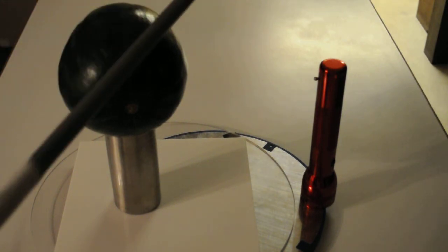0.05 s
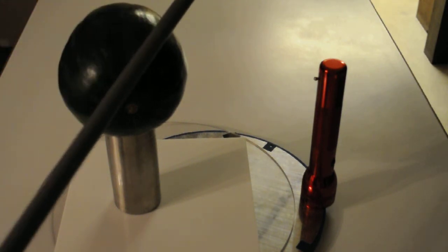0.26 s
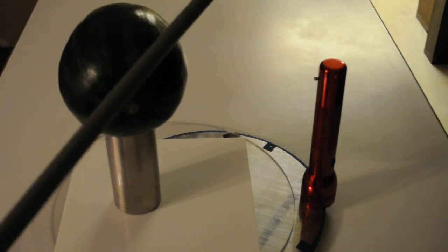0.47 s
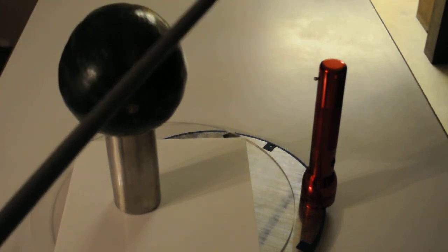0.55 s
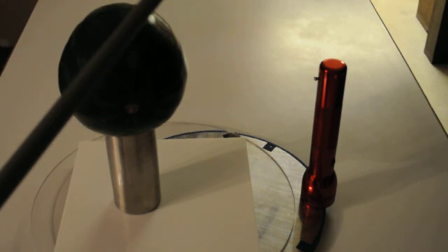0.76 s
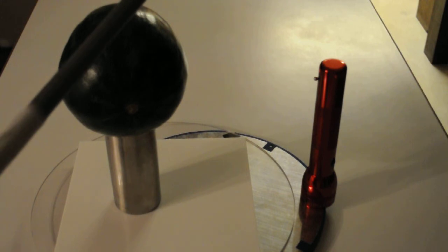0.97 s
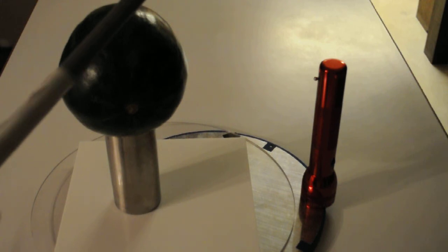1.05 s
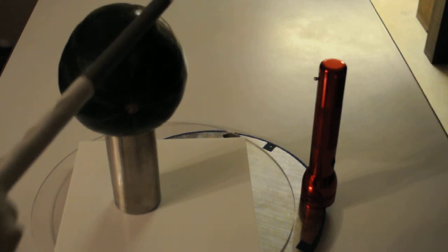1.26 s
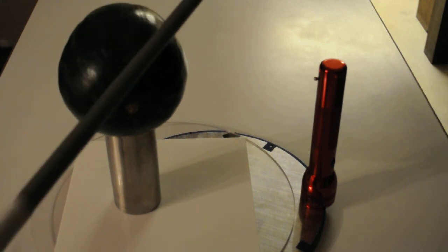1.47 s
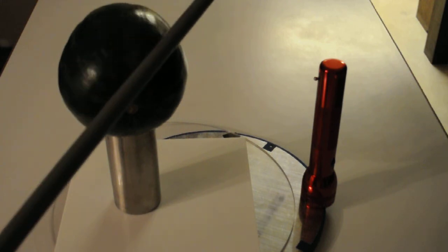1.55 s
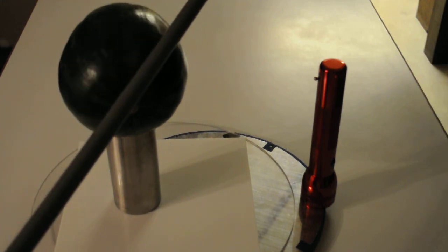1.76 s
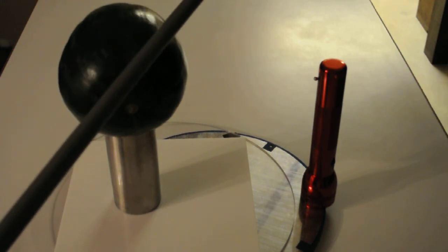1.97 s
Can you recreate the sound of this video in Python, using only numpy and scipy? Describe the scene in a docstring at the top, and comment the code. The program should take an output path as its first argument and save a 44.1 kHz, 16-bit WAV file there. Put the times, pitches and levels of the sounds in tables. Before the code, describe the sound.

One sharp spark crack rings out amid electrical hiss, crackle and small snaps in a workshop.

```python
"""A dull bump on a workshop bench dies away while a machine hums quietly behind everything.
A charged rod moves past a metal ball, and electricity leaking into the air (corona) hisses, crackles
and snaps. At 0.35 s one big spark jumps with a harsh, clipped crack and rings through the room.
The weakened hiss swells softly around 1 s, a second bump comes at 1.27 s, and the snaps grow busy again."""
import sys
import numpy as np
from scipy import signal
from scipy.fft import rfft, irfft, next_fast_len
from scipy.io import wavfile
from scipy.ndimage import map_coordinates

SR = 44100
rng = np.random.default_rng(int(sys.argv[2]) if len(sys.argv) > 2 else 0)


def waveform_to_disk(signal):
    """Save audio, clipped to [-1, 1], as 16-bit WAV at the path in sys.argv[1]."""
    frames = np.transpose(np.atleast_2d(signal))
    scaled = np.clip(frames, -1, 1) * 32767
    samples = np.round(scaled).astype(np.int16)
    wavfile.write(sys.argv[1], SR, samples)


N = 88200
TIME_S = np.arange(N) / SR


def amp(db):
    """Turn decibels into a number to multiply by."""
    return 10 ** (np.asarray(db) / 20)


def along(table, hz):
    """Look up a table's value at any pitch, sliding between rows on a log scale."""
    pitches, values = np.transpose(table)
    return np.interp(np.log(hz + 1), np.log(pitches + 1), values)


def since(start_s):
    """Seconds since start_s, zero before it."""
    return np.maximum(TIME_S - start_s, 0)


def wobble(per_s):
    """A smooth curve through per_s random points a second."""
    return map_coordinates(rng.standard_normal(int(N * per_s / SR) + 4), [TIME_S * per_s])


def filtered(x, response):
    """Change the strength and timing of each pitch in x by response(hz)."""
    size = next_fast_len(N + SR // 2)
    return irfft(rfft(x, size) * response(np.fft.rfftfreq(size, 1 / SR)), size)[:N]


# How well the microphone hears each pitch: pitch_hz, gain_db
MIC_TONE = [(15, -16), (45, 0.5), (5000, 1.5), (5400, -3.5), (5800, -12.5), (6080, -26), (6350, -45.5),
            (6700, -83)]
def heard(x):
    """The microphone loses the deepest bass and the high treble."""
    return filtered(x, lambda hz: amp(along(MIC_TONE, hz)))


def noise(tone):
    """Noise shaped by a tone table, with an average (rms) size of 1 at the microphone."""
    x = filtered(rng.standard_normal(N), lambda hz: amp(along(tone, hz)))
    return x / heard(x).std()


def pulses(rows, response):
    """One click of air pressure for each row of start_s, peak_db."""
    start_s, peak_db = np.transpose(rows)
    samples = np.clip(np.round(start_s * SR).astype(int), 0, N - 1)
    train = np.bincount(samples, amp(peak_db), N)
    one_click = heard(filtered(signal.unit_impulse(N, N // 2), response))
    return filtered(train, response) / np.abs(signal.hilbert(one_click)).max()


# Knocks on the bench: start_s, strength_db
KNOCKS = [(-.06, -5.5), (1.272, 1.8)]
# The notes the bench rings with: pitch_hz, level_db, fade_s (time to fall 60 dB)
BENCH_NOTES = [(229, -41.5, .75), (249.4, -43, .7), (283, -46.5, .55), (335, -47, .45), (423.6, -43.5, .5),
               (504, -44.5, .55), (542, -50, .4)]
# The tone of a knock's click and of its boom: pitch_hz, gain_db
CLICK_TONE = [(1000, -37), (2600, -15.5), (3300, -2), (4500, 0), (5600, -1)]
BOOM_TONE = [(50, -27), (130, -14.5), (240, -1), (350, -9.5), (450, -2.5), (560, -12), (750, -20),
             (1500, -27.5), (4000, -59)]
def bumps(click_db=-25.5, boom_db=-36.5, boom_fade_s=.46, rise_s=.0023):
    """Each soft knock makes a thin click, sets the bench ringing and booms in the room."""
    clicks = [(start_s, db + click_db) for start_s, db in KNOCKS if start_s > 0]
    out = pulses(clicks, lambda hz: amp(along(CLICK_TONE, hz)))
    for start_s, strength_db in KNOCKS:
        t = since(start_s)
        ring = sum(amp(db - 60 * t / fade_s) * np.sin(2 * np.pi * hz * t)
                   for hz, db, fade_s in BENCH_NOTES)
        boom = amp(boom_db - 60 * t / boom_fade_s) * noise(BOOM_TONE)
        out += amp(strength_db) * (ring + boom) * (1 - np.exp(-t / rise_s))
    return out


# The notes the machine hums: pitch_hz, level_db
MACHINE_NOTES = [(177.2, -60.3), (190, -65.5), (236.9, -67.5), (301.5, -62), (355.3, -63), (489.9, -67.5)]
# The tone of the room's background noise: pitch_hz, gain_db
AIR_TONE = [(25, -43.5), (45, -25), (70, -4.5), (130, -8), (200, -1), (420, -1), (700, -8.5), (1300, -8.5),
            (2200, -14), (5000, -22)]
def workshop_hum(mains_hz=59.2, mains_db=-73, waver_db=2.8, air_db=-51.5):
    """A machine and the mains power hum a little unsteadily over the noise of the room."""
    hum = np.zeros(N)
    for hz, db in list(MACHINE_NOTES) + [(mains_hz, mains_db)]:
        level = amp(db + waver_db * wobble(12.9))
        drift = .571 * wobble(9.96)
        hum += np.sqrt(2) * level * np.sin(2 * np.pi * hz * TIME_S + drift)
    return hum + amp(air_db) * noise(AIR_TONE)


# The tone of one tiny spark: pitch_hz, gain_db
TINY_SPARK_TONE = [(100, -24.5), (600, -12), (1500, -8), (3000, -4), (4300, 0), (5500, -0.5)]
def tiny_spark(hz):
    """The filter for a tiny spark: -1j makes the air pressure swing quickly once each way."""
    return -1j * amp(along(TINY_SPARK_TONE, hz))


# The leak as the rod nears and leaves the ball; the big spark drains it: time_s, strength_db
CORONA_STRENGTH = [(0, -56), (.06, -52.5), (.085, -46), (.185, -46.5), (.26, -44.5), (.34, -43),
                   (.38, -49.5), (.7, -49.5), (.77, -47), (.84, -49), (.91, -47), (1.08, -48), (1.19, -58),
                   (1.39, -54.5), (1.46, -47.5), (1.621, -46.5), (1.7, -45), (1.81, -47.5), (1.87, -56),
                   (2, -55.5)]
# The tone of the hiss: pitch_hz, gain_db
HISS_TONE = [(200, -19.5), (600, 2), (1200, -2.5), (2300, 0.5), (3300, -0.5), (4500, 0.5), (5600, -4.5)]
def corona(hiss_db=-2, waver_db=.6, crackle_db=-3, crackles_per_s=900, spread_db=3.5):
    """Countless tiny sparks blur into hiss; the stronger the leak, the more the crackle stands out."""
    strength_db = np.interp(TIME_S, *np.transpose(CORONA_STRENGTH))
    hiss = amp(strength_db + hiss_db + waver_db * wobble(40)) * noise(HISS_TONE)
    fires = rng.random(N) < crackles_per_s / SR
    sizes = amp(spread_db * np.minimum(rng.standard_normal(N), 2))
    crackle = filtered(fires * sizes, tiny_spark)
    top_db = strength_db.max()
    steeper_db = top_db + 1.2 * (strength_db - top_db)  # crackle rises and falls more than hiss
    return hiss + amp(steeper_db + crackle_db) * crackle / heard(crackle).std()


# How long the room rings: pitch_hz, fade_s (time to fall 60 dB)
ROOM_FADE = [(200, .5), (800, 0.64), (2000, 0.62), (5500, 0.45)]
def room_fade(x, start_s):
    """Play x from start_s on, each pitch dying away as it does in the room."""
    hz, t, spectrum = signal.stft(x, SR, nperseg=256)
    fade = amp(-60 * np.maximum(t - start_s, 0) / along(ROOM_FADE, hz)[:, None])
    return signal.istft(spectrum * fade, SR, nperseg=256)[1][:N] * (TIME_S >= start_s)


# Small sparks heard one by one: start_s, peak_db
SMALL_SPARKS = [(.0390, -30.5), (.0512, -23), (.0726, -28), (.0795, -25), (.0822, -23.5), (.0946, -30),
                (.1484, -18), (.1513, -28), (.1661, -26), (.1707, -26), (.1988, -28.5), (.2029, -19),
                (.2096, -29.5), (.2206, -27), (.2240, -30), (.2389, -19.5), (.2425, -27.5), (.2460, -25.5),
                (.2534, -23), (.2584, -26), (.2640, -21.5), (.2711, -26), (.2780, -20), (.2864, -23),
                (.2933, -20), (.3041, -23), (.3210, -27), (.3245, -23.5), (.3286, -21.5), (.5970, -28),
                (.6284, -27), (.6383, -24.5), (.7061, -27.5), (.7451, -23.5), (.7696, -24), (.7808, -29.5),
                (.9926, -25.5), (1.3983, -26), (1.4312, -18.5), (1.4440, -20.5), (1.4945, -28),
                (1.5138, -21.5), (1.5462, -22.5), (1.5566, -27), (1.5666, -19), (1.5877, -20.5),
                (1.6034, -27), (1.6104, -25), (1.6494, -25.5), (1.6538, -29), (1.6576, -24), (1.6616, -27),
                (1.6668, -24), (1.6798, -24.5), (1.6910, -29.5), (1.7084, -20.5), (1.7323, -22),
                (1.7499, -25), (1.7598, -25), (1.7854, -26), (1.8028, -27.5), (1.8151, -29),
                (1.8337, -26.5), (1.8951, -19), (1.9741, -23)]
def snaps(room_db=-11):
    """Small sparks snap close by, with only a little echo from the room."""
    direct = pulses(SMALL_SPARKS, tiny_spark)
    room = room_fade(rng.standard_normal(N), 0)
    echo = signal.fftconvolve(direct, room / np.linalg.norm(room))[:N]
    return direct + amp(room_db) * echo


# Hard surfaces that throw the crack back: delay_s, peak_db
WALL_ECHOES = [(.001, -17), (.0041, -8.5), (.0155, -20.5), (0.095, -22.5)]
# The tone of the crack and of the room's answer: pitch_hz, gain_db
CRACK_TONE = [(30, 6), (300, -1), (1300, 8), (2300, 2), (3500, 1.5), (6000, 8)]
ECHO_TONE = [(60, -26.5), (250, -31), (500, -5), (900, -4), (1500, -0.5), (2800, -1), (4500, 1.5),
             (5600, .5)]
def big_spark(start_s=.346, peak_db=.6, tail_db=-24, tail_rise_s=.0036):
    """One very short, hard push of air bounces off the walls and leaves the room ringing."""
    def bright_crack(hz, ring_hz=4550, width_hz=1100, ring_db=6):
        """A brief high ring gives the crack its bright edge."""
        ring = 1j * hz * width_hz / (ring_hz ** 2 - hz ** 2 + 1j * hz * width_hz)
        return -1j * amp(along(CRACK_TONE, hz)) * (1 + amp(ring_db) * ring)

    crack = pulses([(start_s, peak_db)], bright_crack)
    arrivals = [(start_s + delay_s, db) for delay_s, db in WALL_ECHOES]
    echoes = pulses(arrivals, lambda hz: -amp(along(ECHO_TONE, hz)))
    tail = room_fade(noise(ECHO_TONE), start_s) * (1 - np.exp(-since(start_s) / tail_rise_s))
    return crack + echoes + amp(tail_db) * tail


# The tone of the soft, duller swell in the hiss: pitch_hz, gain_db
SWELL_TONE = [(400, -10), (900, -7), (1300, -0.5), (2200, -8.5), (3500, -9), (5500, -11)]
def hiss_swell(peak_s=.99, width_s=.18, level_db=-52.5):
    """The middle pitches of the hiss swell and fade once."""
    swell = np.exp(-((TIME_S - peak_s) / width_s) ** 2 / 2)
    return amp(level_db) * swell * noise(SWELL_TONE)


def scene():
    """All the sounds meet at one microphone."""
    return (bumps() + workshop_hum() + corona() + snaps() + big_spark() + hiss_swell())[None]


def record(dry):
    """The loud crack is clipped: its peak is cut flat, giving a harsh, bright splash of treble."""
    clip_level, top_hz = .72, 15700
    clipped = np.clip(heard(dry[0]), -clip_level, clip_level)
    return filtered(clipped, lambda hz: 1 / (1 + (hz / top_hz) ** 100))[None]


dry = scene()
out = record(dry)
waveform_to_disk(out)
```